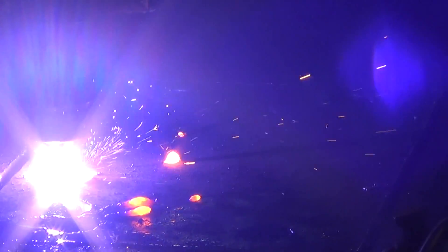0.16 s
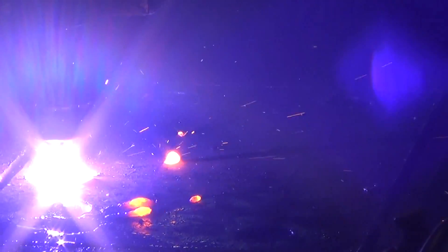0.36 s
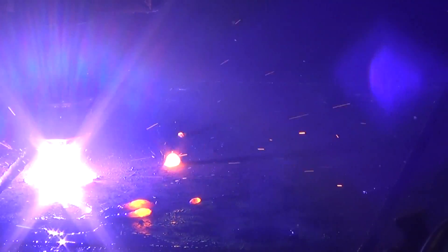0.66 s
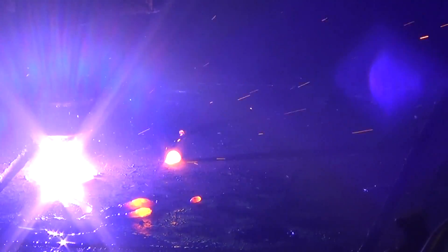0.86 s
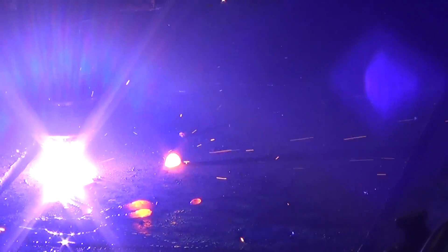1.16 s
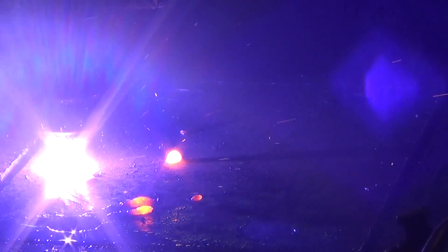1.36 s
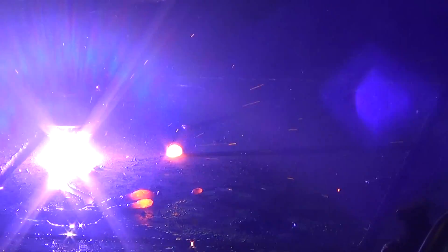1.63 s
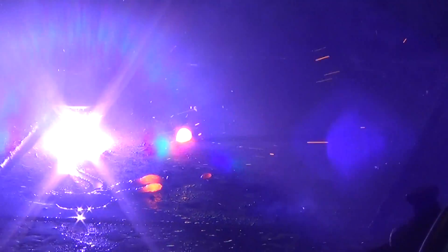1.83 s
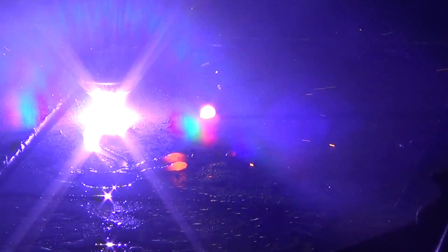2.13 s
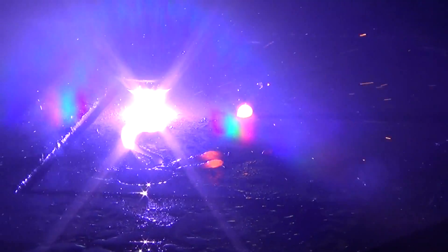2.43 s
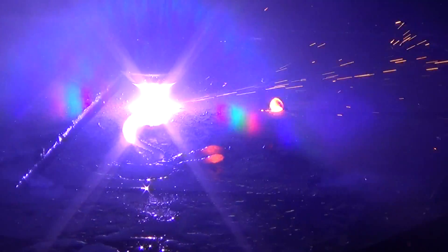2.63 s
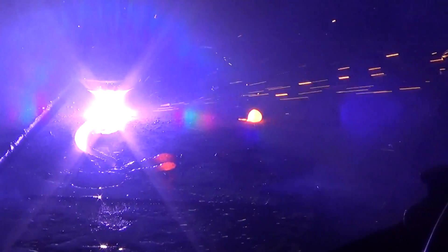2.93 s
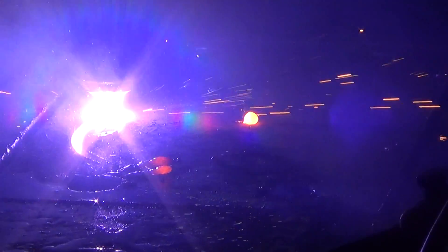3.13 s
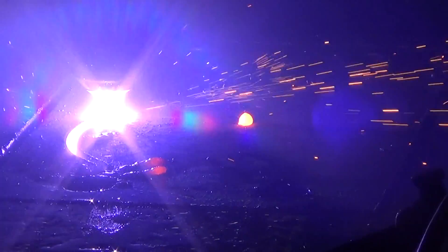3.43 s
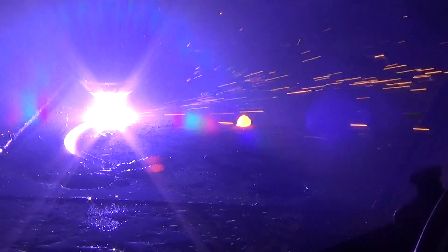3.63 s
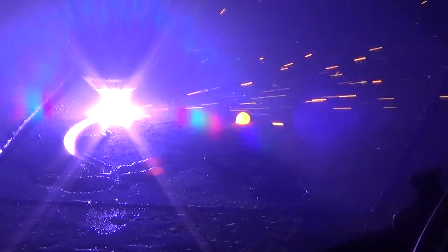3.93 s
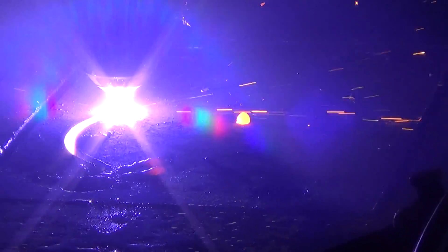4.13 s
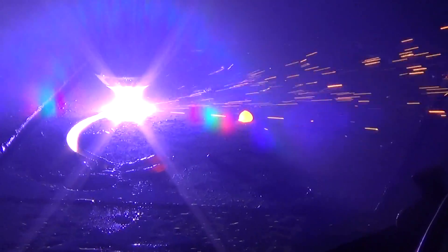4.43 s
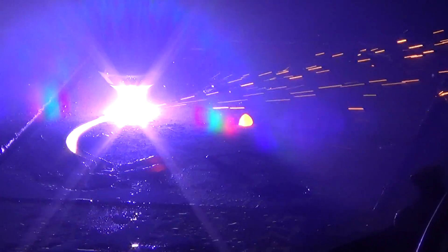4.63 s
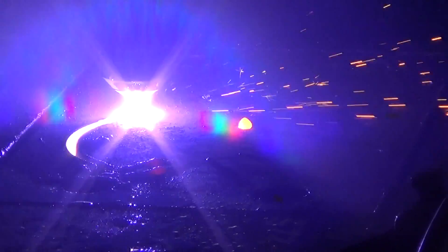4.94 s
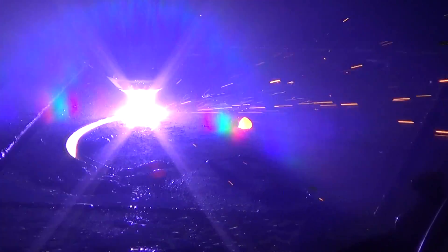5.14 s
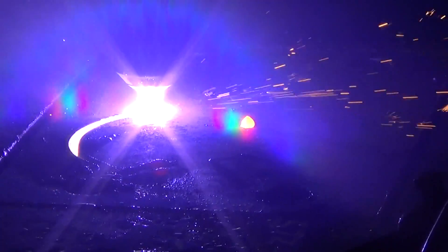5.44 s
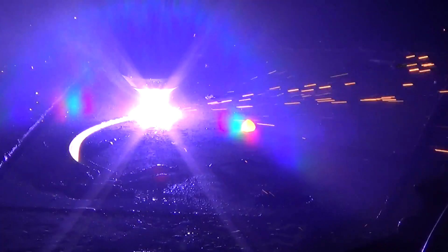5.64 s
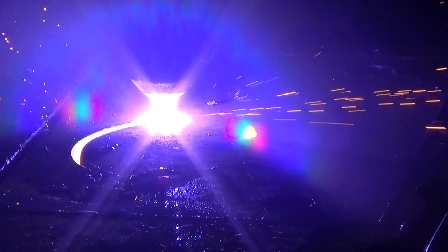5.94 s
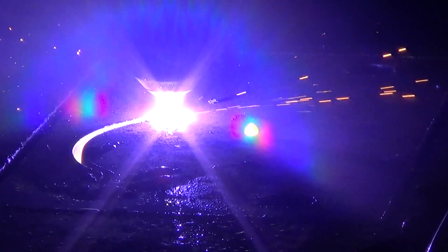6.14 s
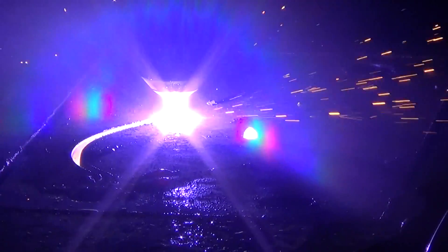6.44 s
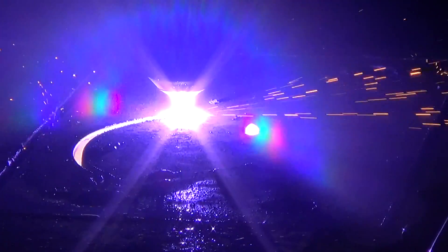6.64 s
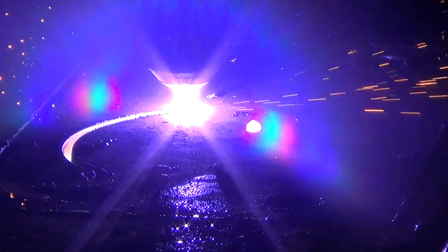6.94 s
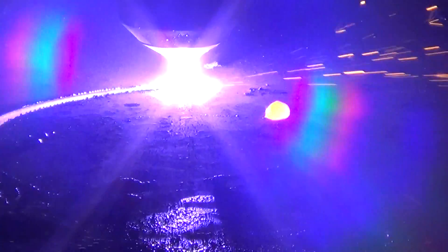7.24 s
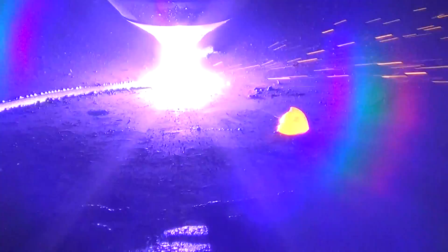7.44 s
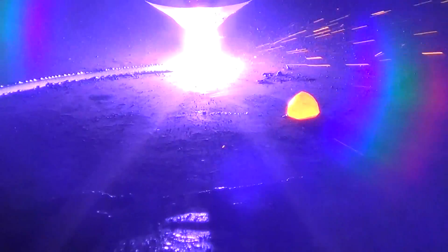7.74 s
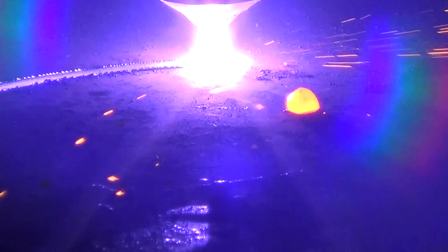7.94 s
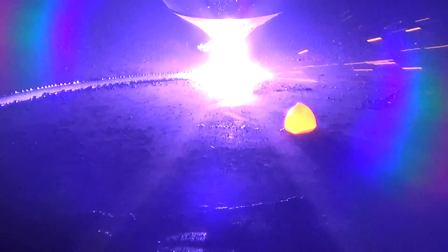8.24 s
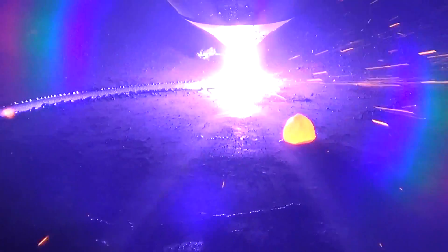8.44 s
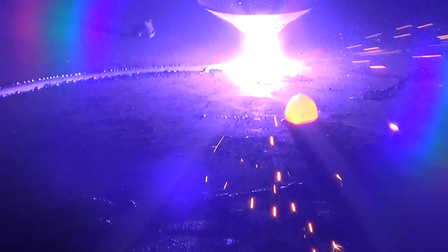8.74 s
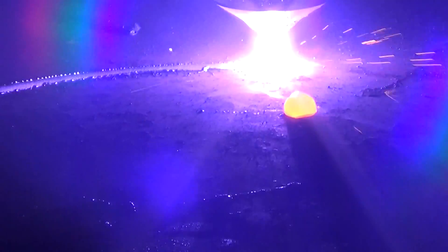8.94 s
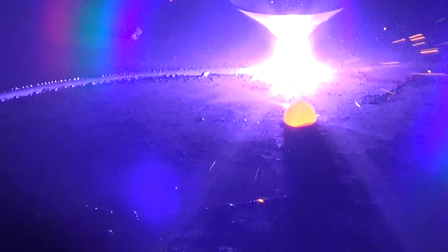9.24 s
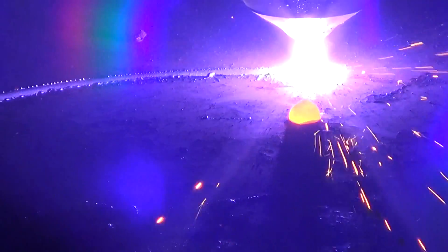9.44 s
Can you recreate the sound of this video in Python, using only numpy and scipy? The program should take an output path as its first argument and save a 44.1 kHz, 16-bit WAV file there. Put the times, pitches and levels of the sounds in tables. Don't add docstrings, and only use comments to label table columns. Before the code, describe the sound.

Loud unbroken jet hiss with a rough mid-range roar and quick sputters as an arc torch cuts metal, faint fans droning behind.

```python
import sys
import numpy as np
from scipy import signal
from scipy.fft import rfft, irfft, next_fast_len
from scipy.io import wavfile
from scipy.ndimage import uniform_filter1d, map_coordinates

SR = 44100
rng = np.random.default_rng(int(sys.argv[2]) if len(sys.argv) > 2 else 0)


def decibels_to_gain(level_db):
    exponent = np.asarray(level_db, float) / 20
    return 10 ** exponent


def wav_record(signal):
    frames = np.transpose(np.atleast_2d(signal))
    bounded = np.clip(frames, -1, 1)
    quanta = np.round(bounded * 32767).astype(np.int16)
    wavfile.write(sys.argv[1], SR, quanta)


N = 422919
STEADY_S = 0.2


def unit(x):
    return x / np.sqrt(np.mean(np.abs(x) ** 2) + 1e-20)


def centred(x):
    return x - x.mean()


def along(points, hz):
    f, v = np.transpose(points)
    return np.interp(np.log(hz + 1), np.log(f + 1), v)


def curves(rows):
    knots, *columns = np.transpose(rows)
    t = np.arange(N) / SR
    return [np.interp(t, knots, column) for column in columns]


def wobble(rate_hz):
    knots = rng.standard_normal(int(N * rate_hz / SR) + 4)
    flutter = map_coordinates(knots, [np.arange(N) * rate_hz / SR])
    return flutter - uniform_filter1d(flutter, int(STEADY_S * SR))


def filtered(x, response):
    m = next_fast_len(N + 8192)
    return irfft(rfft(x, m) * response(np.fft.rfftfreq(m, 1 / SR)), m)[..., :N]


def coloured(pair, spectrum):
    return unit(filtered(pair, lambda hz: decibels_to_gain(along(spectrum, hz))))


def hump(hz, centre_hz, width_hz):
    return 1 / (1 + (2 * (hz - centre_hz) / width_hz) ** 2)


def turbulence(patchy_db, bins, frames, shape=lambda hz, s: 1):
    hz, s, z = signal.stft(rng.standard_normal((2, N)), SR, nperseg=2048)
    field = rng.standard_normal(z.shape[1:])
    for axis, size in enumerate((bins, frames)):
        for _ in range(2):
            field = uniform_filter1d(field, size, axis)
    rows, cols = np.indices(field.shape)
    field = field[(rows + cols // 2) % len(hz), cols]
    z = z * decibels_to_gain(patchy_db * unit(field)) * shape(hz[:, None], s)
    return signal.istft(z, nperseg=2048)[1][:, :N]


# (blade rate at DRIFT_AT_S [Hz], drift [Hz/s], bend [Hz/s2], in step with the first at [s])
FANS = [(369.026, -.009, -.0103, 5), (367.787, .039, .0244, 5.058), (372.049, .073, -.0222, 5.125),
        (362.216, .003, -.0405, 5.14)]
FAN_DB = (-51.5, -51, -52.5, -59.5)
DRIFT_AT_S, FANS_FADE_DB_PER_S = 4.8, -0.1


def fans():
    t = np.arange(N) / SR

    def turns(fan, s):
        blade_hz, drift, bend, _ = fan
        u = s - DRIFT_AT_S
        return blade_hz * u + 0.5 * drift * u ** 2 + bend * u ** 3 / 6

    tones = 0
    for fan, db in zip(FANS, FAN_DB):
        step_s = fan[3]
        phase = turns(fan, t) - turns(fan, step_s) + turns(FANS[0], step_s)
        tones = tones + decibels_to_gain(db) * np.cos(2 * np.pi * phase)
    return decibels_to_gain(FANS_FADE_DB_PER_S * (t - DRIFT_AT_S)) * tones * np.array([[1], [0.03]])


# (frequency [Hz], level [dB], side share [ratio])
WHINES = [(34.49, -87, 0), (49.58, -79, 0), (68.98, -79, 0), (103.47, -74, 0), (120.01, -68, 0),
          (137.96, -69, 0), (480, -69, -.1), (583.53, -62.5, -.2), (722.15, -55.5, -.15),
          (1123.5, -68, -.2)]


def whines():
    t = np.arange(N) / SR
    total = 0
    for hz, db, side in WHINES:
        tone = decibels_to_gain(db) * np.sin(2 * np.pi * (hz * t + rng.random()))
        total = total + tone * np.array([[1], [side]])
    return total


# (time [s], frequency [Hz], level [dB])
PINGS = [
    (5, 1800, -50),
    (4.52, 1795, -33),
    (4.52, 2500, -43),
    (1.2, 1000, -44),
]


def pings():
    t = np.arange(N) / SR
    total = 0
    for s, hz, db in PINGS:
        total = total + decibels_to_gain(db) * np.exp(-((t - s) / 0.026) ** 2) * np.sin(2 * np.pi * hz * t)
    return total * np.array([[1], [0.1]])


def drone(slow_db, duck_db):
    gain = decibels_to_gain(1.1 * centred(slow_db) + 0.5 * duck_db)
    return gain * (fans() + whines()) + pings()


# (centre [Hz], width [Hz], over the roar [dB])
START = [(422, 16, 2), (480, 60, 2.5), (629, 35, 9), (687, 64, 6), (765, 22, 5.5), (954, 16, 9.5),
         (1050, 30, 2), (1210, 24, 4.5), (1284, 26, 1.5), (1362, 29, 5), (1580, 88, 3.5)]
MIDDLE = [(422, 18, 5.6), (513, 53, 4.8), (556, 18, 5.5), (602, 28, 3.1), (748, 62, 11), (920, 30, 4.4),
          (980, 48, 5), (1125, 22, 4), (1210, 30, 2.8), (1430, 41, 7.7), (1665, 30, 2.6), (1950, 78, 2.7)]
END = [(263, 16, 3.4), (417, 14, 6), (470, 24, 7.1), (519, 30, 8.1), (560, 26, 6.9), (605, 22, 3),
       (740, 36, 11.3), (858, 39, 5.5), (929, 23, 12), (980, 25, 5.4), (1380, 66, 5), (1400, 28, 3),
       (1650, 120, 4.8)]
# (centre [Hz], width [Hz], level [dB])
SLOT = [(2376, 50, 2), (2975, 200, 3), (3820, 500, 4.5), (4280, 220, -2.5), (4860, 500, 1.5)]
# (centre [Hz], width [Hz], level [dB])
HALL = [(247, 12, 1), (266, 14, 2), (280, 10, -4), (288, 10, 2.5), (310, 14, -4), (328, 14, 1.5),
        (385, 11, -8), (396, 8, 3.5), (402, 10, -7), (442, 13.5, -4), (740, 11, -2), (883, 50, -2.5),
        (1157, 25, -2), (1460, 30, -2)]
# (time [s], place [0 start, 1 middle, 2 end])
TRAVEL = [(0, 0), (3.3, 0), (3.9, 1), (7.5, 1), (8.0, 1.5), (8.7, 1.5), (8.95, 2), (9.59, 2)]


def resonant(pair):
    place, = curves(TRAVEL)
    out = 0
    for k, modes in enumerate((START, MIDDLE, END)):
        ripple = rng.standard_normal(900)

        def gain(hz):
            modes_db = sum(db * hump(hz, c, w) for c, w, db in [*modes, *SLOT, *HALL])
            ripple_db = 1.7 * np.clip(hz / 2500, 0, 1) * np.interp(hz / 22, np.arange(900), ripple)
            return decibels_to_gain(modes_db + ripple_db)

        nearness = np.clip(1 - np.abs(place - k), 0, 1)
        out = out + nearness * filtered(pair, gain)
    return out


# (frequency [Hz], density [dB/Hz])
HUM = [(8, -120), (30, -19), (60, -15), (100, -11), (130, -9), (200, -5.5), (300, -1.5), (400, -6),
       (600, -120)]


def hum(gas, slow_db, grip_db, duck_db):
    hum_db = -52.5 + 1.6 * centred(slow_db) + 0.28 * centred(grip_db)
    return decibels_to_gain(hum_db + 0.3 * duck_db) * coloured(gas, HUM)


# (frequency [Hz], density [dB/Hz])
RUMBLE = [(150, -120), (260, -33.5), (380, -4.5), (480, -2.5), (900, -2), (1100, -12.5), (1400, -19.5),
          (2000, -120)]


def plate(gas, slow_db, grip_db, duck_db):
    return decibels_to_gain(slow_db + grip_db + 0.55 * duck_db) * coloured(gas, RUMBLE)


# (frequency [Hz], density [dB/Hz])
TABLE = [(700, -120), (1000, -8), (1250, 0), (2000, 0), (2600, -1), (3200, -13.5), (4200, -120)]


def table(gas, slow_db, grip_db, duck_db):
    table_db = slow_db + duck_db - 9 + 0.18 * centred(grip_db)
    return decibels_to_gain(table_db) * coloured(gas, TABLE)


# (frequency [Hz], density [dB/Hz])
KERF = [(1800, -120), (2500, -20.5), (3000, -6), (4300, 0), (5200, 2.5), (6000, -9.5), (7500, -120)]


def kerf(gas, slow_db, duck_db):
    return decibels_to_gain(slow_db + duck_db - 0.4) * coloured(gas, KERF)


# (time [s], roar under the gain control [dB], grip of the gas on the plate [dB])
ROAR = [(0.05, -28.5, -10), (0.07, -28.5, -10), (0.34, -28, -10.5), (2.59, -26.5, -11.5), (2.64, -27, -11),
        (3.7, -28, -15), (4.52, -28, -10), (5.69, -30, -12.5), (5.84, -29.5, -9), (6.11, -31.5, -11.5),
        (6.61, -30.5, -9), (7.33, -31, -11), (8.38, -28.5, -10.5), (8.62, -29.5, -13), (9.07, -27.5, -8.5),
        (9.55, -28.5, -9)]


def roar(duck_db):
    slow_db, grip_db = curves(ROAR)
    gas = resonant(turbulence(1.55, bins=2, frames=4))
    under = hum(gas, slow_db, grip_db, duck_db) + plate(gas, slow_db, grip_db, duck_db)
    return under + table(gas, slow_db, grip_db, duck_db) + kerf(gas, slow_db, duck_db)


# (frequency [Hz], density [dB/Hz])
FLANK = [(4000, -120), (5000, -19.5), (5700, -3.5), (7000, 0), (8200, 1), (9300, -2), (10500, -120)]


def flank(skirts, mean_db, swing_db, lean_db, duck_db):
    level_db = mean_db - 6 + 0.067 * swing_db + lean_db + 0.56 * duck_db
    return decibels_to_gain(level_db + 0.26 * wobble(9) + 1.02 * wobble(40)) * coloured(skirts, FLANK)


# (frequency [Hz], density [dB/Hz])
SIZZLE = [(10000, -120), (11000, -16), (12200, 3.5), (13000, 2.5), (14000, -0.5), (15000, -3), (15800, -10)]


def sizzle(skirts, mean_db, swing_db, lean_db, duck_db):
    level_db = mean_db - 6 + 0.2 * swing_db - 0.25 * lean_db + 0.3 * duck_db
    return decibels_to_gain(level_db + 0.56 * wobble(17) + 1.1 * wobble(40)) * coloured(skirts, SIZZLE)


# (from [s], to [s], from [Hz], to [Hz], crest [dB])
RIDGES = [(-.2, .4, 9800, 10060, 5.5), (.1, .6, 11600, 11300, 5), (.4, .9, 9950, 10100, 4),
          (1.0, 1.6, 10600, 10400, 4), (1.3, 2.0, 9850, 9750, 2), (3.4, 4.4, 10800, 10000, 5.5),
          (4.4, 5.2, 10900, 10700, 5), (5.0, 6.6, 10250, 9650, 2), (5.3, 6.5, 11100, 10450, 4.5),
          (6.2, 7.0, 10400, 10300, 5.5), (6.5, 7.9, 10100, 9800, 1.5), (6.8, 7.7, 10750, 10400, 2),
          (7.6, 8.3, 10100, 10000, 4.5), (8.3, 8.8, 10300, 10600, -2), (8.4, 9.0, 11650, 11600, -1)]


def ridges(hz, s):
    db = 0
    for start_s, end_s, from_hz, to_hz, top_db in RIDGES:
        u = np.clip((s - start_s) / (end_s - start_s), 0, 1)
        centre_hz = from_hz + u * (to_hz - from_hz)
        db = db + top_db * np.sin(np.pi * u) * hump(hz, centre_hz, width_hz=240)
    return decibels_to_gain(db)


# (time [s], jet [dB], dip of everything under it [dB])
SPUTTERS = [(.16, -2, 2), (1.42, -0.5, 1), (2.86, -1, -1), (4.19, 1, -1.5), (4.5, 0.5, -1),
            (4.73, 1.5, -1.5), (5.72, .5, -2.5), (5.93, 0, -3.5), (6.06, 0, -1.5), (6.67, -1, 3),
            (7.0, .5, -2.5), (7.13, .5, 0.5), (7.21, 0.5, -2.5), (7.48, 1, -2.5), (7.85, 1, -3.5),
            (8.01, -0.5, 0), (8.52, 2.5, -3), (8.68, .5, -2.5)]
SPUTTER_S = 0.026


def sputters():
    t = np.arange(N) / SR
    total = 0
    for s, jet_db, dip_db in SPUTTERS:
        total = total + np.array([[jet_db], [dip_db]]) * np.exp(-((t - s) / SPUTTER_S) ** 2)
    return total


# (time [s], jet level [dB], lean of the torch, + lifts the low skirt and dulls the high one [dB])
JET = [(0, -19.5, -0.26), (1.0, -19.5, -0.46), (2.0, -19.5, -.5), (2.9, -19, 0.12), (4.3, -19.5, -0.12),
       (5.4, -18, .3), (6.1, -18, -1.5), (6.8, -18.5, -0.27), (7.4, -17.5, 0), (8.1, -19, 1.3),
       (8.6, -17.5, 2.1), (9.0, -19.5, 2), (9.35, -19, 2.4), (9.59, -18.5, -0.35)]
# (frequency [Hz], density [dB/Hz])
HISS = [(6500, -120), (7500, -15), (8800, -8), (9350, -5.5), (9800, -1.5), (11300, -1.5), (12300, -5.5),
        (13300, -22), (14500, -120)]


def jet(flare_db, duck_db):
    level_db, lean_db = curves(JET)
    mean_db, swing_db = level_db.mean(), centred(level_db)
    core = coloured(turbulence(2.2, bins=2, frames=3, shape=ridges), HISS)
    crest = decibels_to_gain(level_db + 0.9 + flare_db + 0.33 * wobble(30)) * core
    skirts = turbulence(2.2, bins=2, frames=3)
    low = flank(skirts, mean_db, swing_db, lean_db, duck_db)
    return crest + low + sizzle(skirts, mean_db, swing_db, lean_db, duck_db)


# (frequency [Hz], side minus mid [dB])
SPREAD = [(40, -26), (200, -23), (500, -18.5), (1000, -10), (1800, -13), (3000, -13), (4500, -13.5),
          (6500, -12.5), (8500, -15), (10000, -19), (11500, -23), (12500, -21.5), (15000, -43)]
# (frequency [Hz], left minus right [dB])
LEAN = [(150, 0.5), (370, -1.7), (700, -.5), (2500, -1), (6000, 0.6), (10000, 0)]


def scene():
    slow_db = curves(ROAR)[0]
    flare = wobble(20)
    spit_db, dip_db = sputters()
    depth = np.clip(-0.2 * (slow_db + 24.5), 0.3, 2)
    flicker_db = depth * (0.62 * wobble(30) + 0.7 * wobble(70))
    duck_db = dip_db - 0.23 * flare + flicker_db
    mid, side = drone(slow_db, duck_db) + roar(duck_db) + jet(0.5 * flare + spit_db, duck_db)
    echo = filtered(side, lambda hz: decibels_to_gain(along(SPREAD, hz)))
    side = decibels_to_gain(0.6 * (slow_db + 27.5) + 0.3 * duck_db) * echo
    halves = np.array([[0.5], [-0.5]])
    return filtered(np.array([mid + side, mid - side]), lambda hz: decibels_to_gain(along(LEAN, hz) * halves))


def top_cut(x):
    return signal.sosfilt(signal.butter(12, 15730, fs=SR, output="sos"), x)


def record(dry):
    ceiling, top_hz = 0.68, 15735
    held = dry / (1 + np.abs(dry / ceiling) ** 6) ** (1 / 6)
    mix = filtered(held, lambda hz: hz < top_hz)
    return top_cut(mix)


dry = scene()
out = record(dry)
wav_record(out)
```